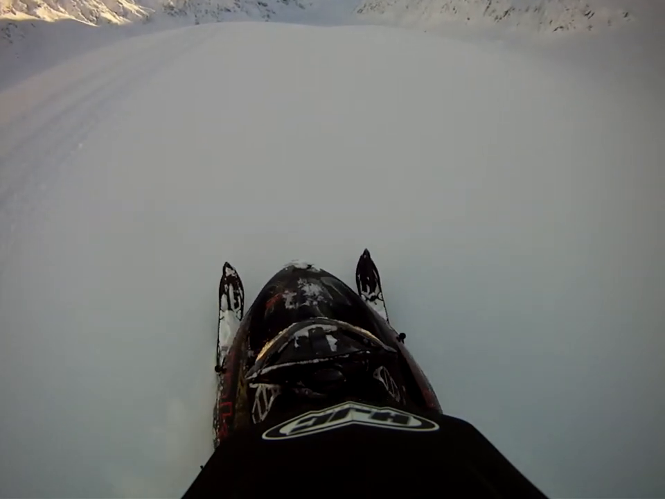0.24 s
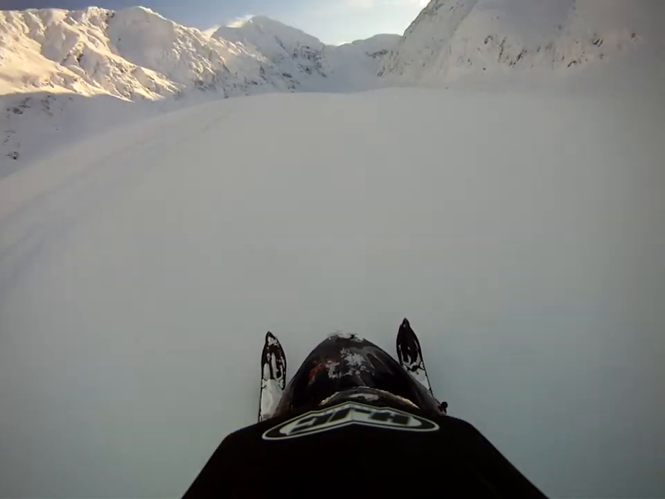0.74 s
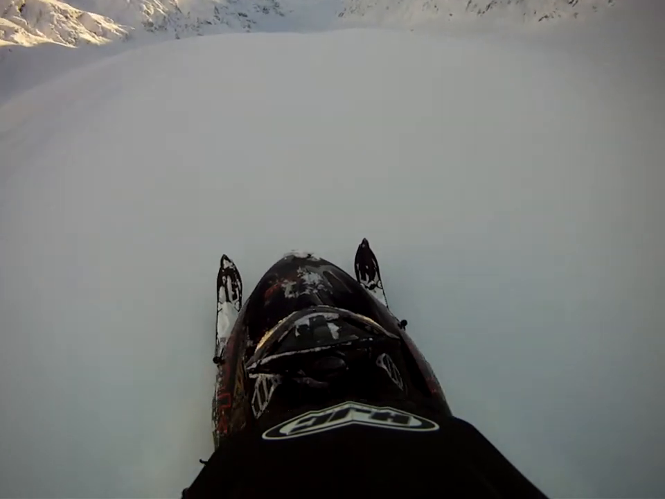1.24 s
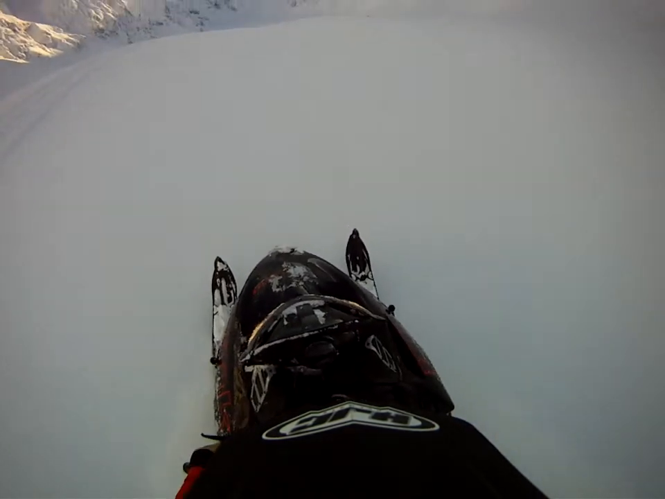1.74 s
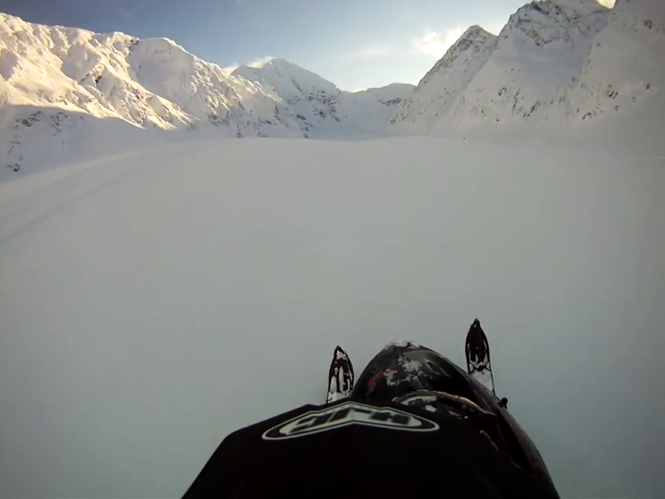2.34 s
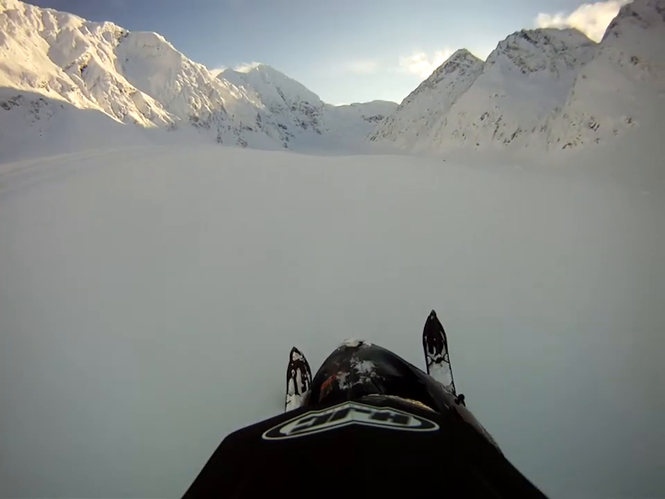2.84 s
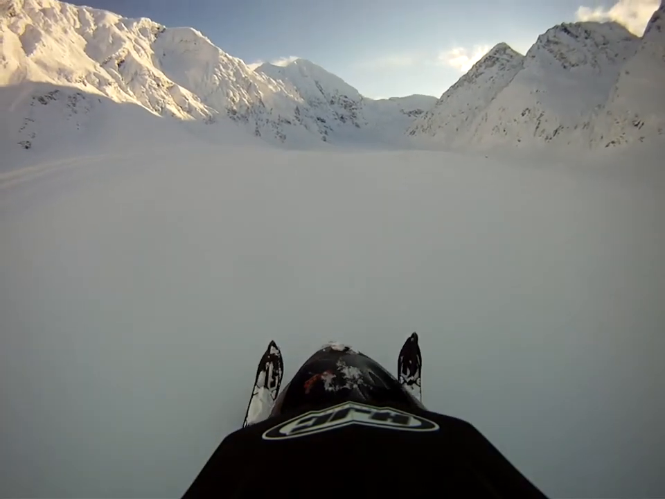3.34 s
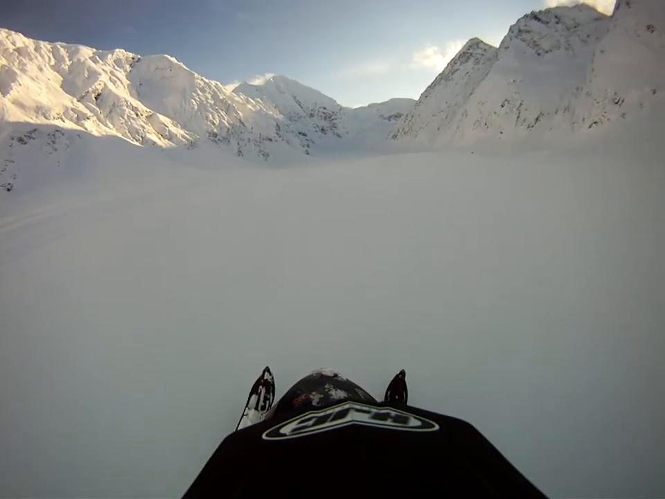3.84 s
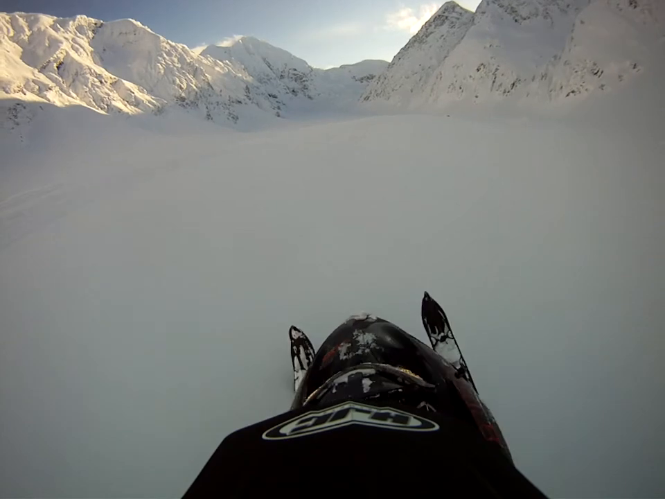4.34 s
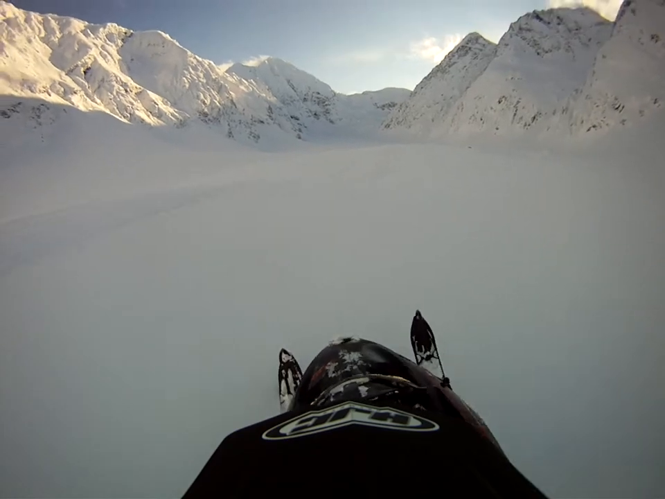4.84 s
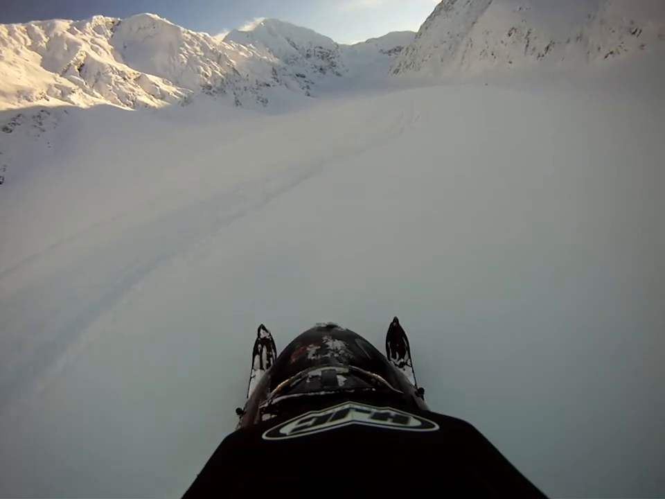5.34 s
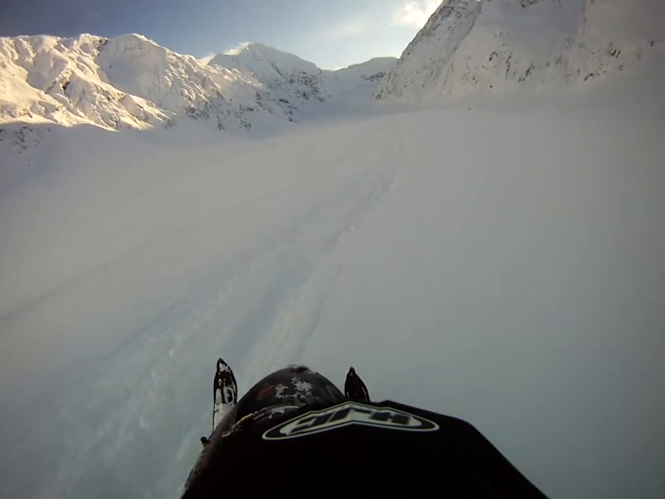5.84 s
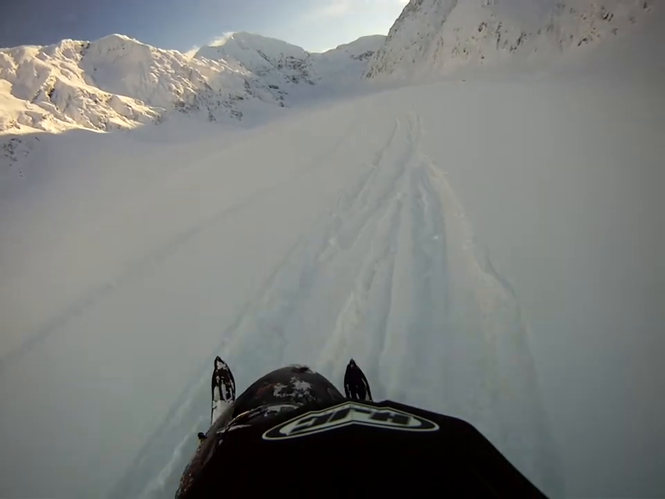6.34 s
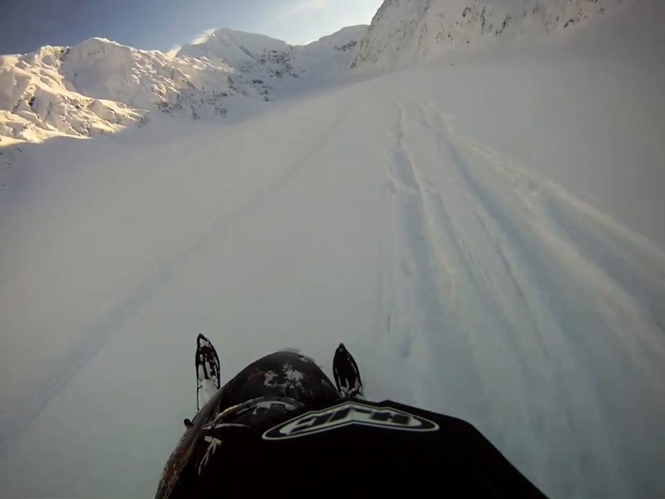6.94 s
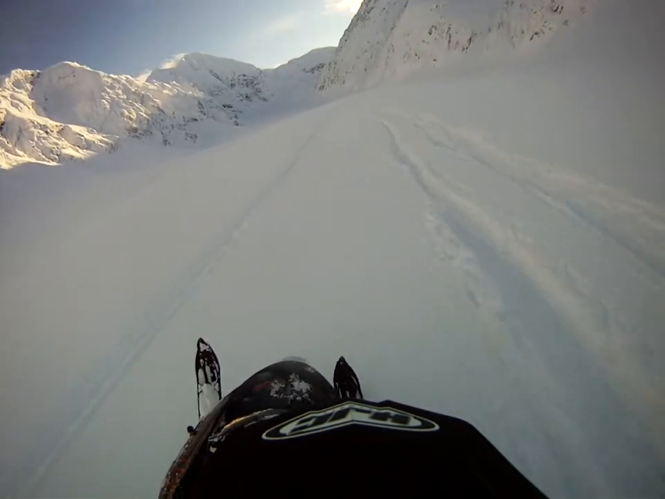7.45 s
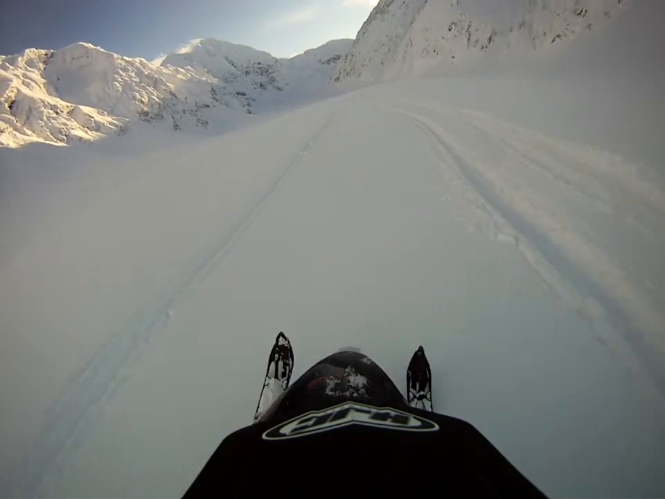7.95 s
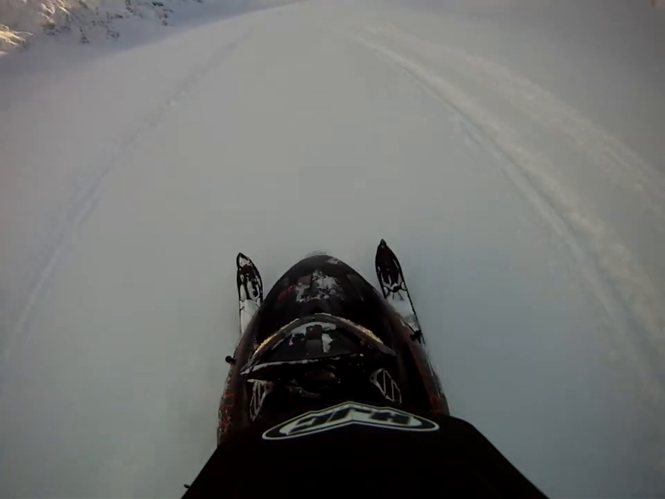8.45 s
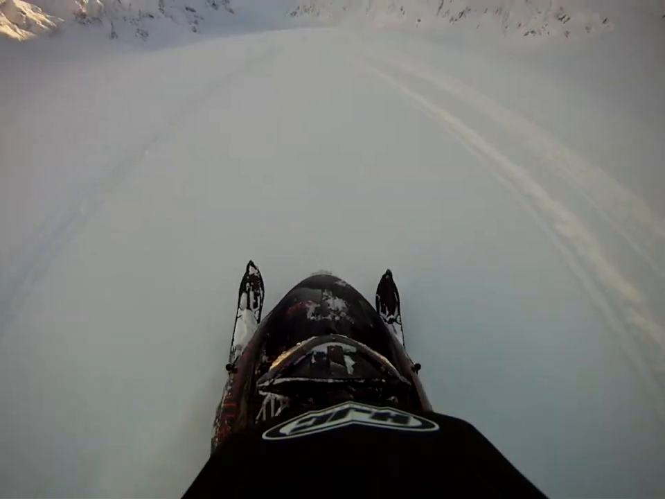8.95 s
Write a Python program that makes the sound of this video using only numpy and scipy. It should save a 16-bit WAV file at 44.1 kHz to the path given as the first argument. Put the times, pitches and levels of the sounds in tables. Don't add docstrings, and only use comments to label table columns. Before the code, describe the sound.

A two-stroke snowmobile howls at high revs up a snowy slope, stumbles with a few pops midway, then climbs back to a raspier, louder howl.

```python
import sys
import numpy as np
from scipy import signal
from scipy.fft import rfft, irfft, next_fast_len
from scipy.io import wavfile
from scipy.ndimage import uniform_filter1d

SR = 44100
rng = np.random.default_rng(int(sys.argv[2]) if len(sys.argv) > 2 else 0)


def master_out(mix):
    frames = np.transpose(np.atleast_2d(mix))
    ceiling = np.clip(frames, -1, 1)
    pcm = np.round(ceiling * 32767).astype(np.int16)
    wavfile.write(sys.argv[1], SR, pcm)


def field_ratio(decibels):
    return 10 ** (np.asarray(decibels, dtype=float) / 20)


N = 404838
T = np.arange(N) / SR


def level(x, db):
    return x * field_ratio(db) / np.sqrt(np.mean(x ** 2))


def curves(table):
    s, *columns = np.transpose(table)
    return [np.interp(T, s, column) for column in columns]


def swells(rows):
    out = np.zeros(N)
    for s, length, size in rows:
        a, b = (int(np.clip((s + side * length) * SR, 0, N)) for side in (-.5, .5))
        out[a:b] += size * np.cos(np.pi * (T[a:b] - s) / length) ** 2
    return out


def walk(rate):
    k = int(SR / rate)
    steps = np.repeat(rng.standard_normal(N // k + 1), k)
    return np.sqrt(2) * uniform_filter1d(uniform_filter1d(steps, k), k)[:N]


def coloured(shape):
    hz, db = np.transpose(shape)
    size = next_fast_len(N)
    f = np.maximum(np.fft.rfftfreq(size, 1 / SR), 1)
    gain = field_ratio(np.interp(np.log(f), np.log(hz), db)) * (f < 6000)
    return level(irfft(rfft(rng.standard_normal(size)) * gain, size)[:N], 0)


# t/s, crank f/Hz
REVS = [(0.0, 122.4), (2.07, 120.3), (2.42, 123.4), (2.62, 129.5), (2.91, 131.4), (3.82, 129.4),
        (4.06, 122.2), (4.25, 119.4), (4.65, 121.7), (4.77, 110.0), (4.87, 103.5), (4.95, 101.7),
        (5.15, 110.1), (5.4, 114.9), (6.44, 118.8), (7.23, 123.9), (7.42, 129.8), (9.18, 134.0)]
# centre t/s, length/s, crank f/Hz
FLARES = [(0.27, 1.0, -1.0), (1.21, 0.67, -0.26), (1.68, 0.53, 0.49), (3.34, 0.76, -1.81),
          (4.44, 0.35, -0.41), (5.76, 0.44, -1.43), (6.1, 0.59, 2.05), (6.38, 0.3, -0.9),
          (6.71, 0.39, 1.37), (7.65, 0.48, 2.08), (8.11, 0.69, 3.13), (8.56, 0.7, -1.47),
          (9.16, 0.48, -0.91)]


def revs():
    return uniform_filter1d(curves(REVS)[0], size=1500) + swells(FLARES)


def crank(hz):
    falling = np.clip(-uniform_filter1d(np.gradient(hz) * SR, 2000) / 80, 0, 1)
    return np.cumsum(hz * (1 + .001 * walk(30))) / SR + .007 * falling * walk(70)


# t/s, roar level/dB, unevenness of the two cylinders level/dB
GAS = [(0, -26, -3), (1.3, -27, -3), (2.9, -26, -3.5), (3.7, -26.5, -3), (3.9, -30.5, -2), (4.05, -26, 4),
       (4.3, -26.5, 1.5), (4.66, -26.5, 1), (4.7, -23, 6), (4.85, -26, 16.5), (5.5, -27, 9.5),
       (5.9, -24.5, 10), (6.75, -22.5, -4), (7.87, -20.5, 4.5), (7.95, -18, -6), (8.12, -27.5, -5),
       (8.35, -21.5, 0), (9.18, -24, 1)]


def gas_flow():
    return curves(GAS)


# t/s, throttle 0-1, pipe howl level/dB
LOAD = [(0.0, 0.21, -17.5), (2.15, 0.18, -18), (2.37, 0.44, -22.5), (2.46, 0.84, -17), (3.3, 0.81, -14.5),
        (3.955, 0.81, -17.5), (3.995, 0.24, -20.5), (4.4, 0.37, -19.5), (4.68, 0.4, -26.5), (5.2, 0.2, -22),
        (6.55, 0.04, -25), (6.68, 0.15, -18), (7.15, 0, -18.5), (7.35, 0.42, -11), (7.85, 0.44, -17),
        (7.95, 0.87, -11), (8.4, 0.86, -17), (9.18, 0.75, -12)]
# crank order, part throttle level/dB, full throttle level/dB, change off the pipe level/dB
STRONG = [(2.0, -9, -28.5, 5), (4.0, -16, -17.5, 7), (6.0, -21, -23.5, 8.5), (8.0, -32, -9.5, 8),
          (10.0, -15, -6.5, 5), (12.0, -1, 3, -6.5), (14.0, -19.5, 0, 14.5), (15.0, -3, -25, -20.5),
          (16.0, -7.5, -15.5, -3), (18.0, -24.5, -13, 15), (24.0, -30.5, -4.5, -6)]
# crank order, part throttle level/dB, full throttle level/dB
WEAK = [(1, -30.5, -28.5), (3, -30.5, -27), (5, -35.5, -26.5), (7, -24, -39), (9, -19, -20),
        (11, -23.5, -5.5), (13, -49, -27.5), (17, -10.5, -41), (19, -18, -32), (20, -10.5, -50),
        (21, -27.5, -49), (22, -48, -9.5), (23, -50, -23), (25, -48, -29), (26, -26, -16.5), (27, -44, -33),
        (28, -18, -59.5), (29, -16, -69), (30, -51, -32)]
# crank order, level/dB
RASP = [(32, -6.5), (34, -2), (36, -4), (38, -1.5), (40, -0.5), (42, -4), (44, -11)]
# centre t/s, length/s, level/dB
RASPS = [
    (2.42, .25, -5),
    (2.85, 1.8, 7),
    (3.6, 1.3, -2.5),
    (6.3, .4, -7),
    (7.75, 0.41, -7),
    (8.65, 1.44, 7.5),
]
SHUT_DB = {4: -3.5, 6: -13, 8: 2}
# centre t/s, length/s, crank
# order, level/dB
ORDER_SWELLS = [(2.19, 0.7, 4, -3.5), (2.328, 0.78, 8, 10), (2.462, 1.1, 6, 10.5), (2.898, 0.78, 4, 6),
                (3.244, 1.36, 6, 5), (3.62, 0.47, 8, 10), (3.642, 0.68, 2, 6.5), (4.607, 0.92, 6, 16),
                (4.625, 0.89, 4, 13), (4.63, 0.74, 2, -10), (6.33, 1.94, 4, 9.5), (6.372, 0.91, 2, 8),
                (6.6, 0.46, 6, 9), (7.007, 0.69, 6, 12.5), (7.227, 0.64, 2, -11.5), (7.44, 0.38, 6, -16),
                (7.879, 1.3, 2, -14), (8.48, 0.62, 4, 8), (8.54, 0.86, 2, 12.5),
                (1.54, 0.88, 10, 4.5), (1.72, 1.5, 16, -14), (2.348, 0.38, 15, 9), (2.53, 1, 10, 5.5),
          (2.66, 0.69, 16, 10), (2.87, 1.3, 14, -10), (3.23, 0.34, 24, -23), (3.45, 0.53, 12, -6),
          (3.87, 1, 18, -7), (4.54, 0.49, 14, 12), (4.54, 0.63, 18, 12), (4.83, 0.18, 15, 19),
          (6.82, 0.69, 16, 5), (7.07, 0.83, 12, -10.5), (7.48, 1.75, 10, -27), (7.63, 0.96, 12, -12.5),
          (8.0, 1.1, 15, 19), (8.099, 0.69, 16, 5.5), (8.14, 0.34, 24, -43), (8.4, 0.55, 18, 12),
          (8.56, 0.84, 15, 14), (8.7, 0.84, 10, 6.5), (8.73, 0.22, 14, -6), (8.97, 1.2, 18, 7.5),
          (9.04, 1.15, 24, -11),
                (1.596, 0.67, 12, -4), (1.98, 0.28, 12, 2.5), (2.524, 0.56, 12, 1), (2.95, 0.46, 24, 3.5),
          (2.95, 0.5, 40, 7), (3.447, 0.43, 14, 4.5), (3.45, 0.83, 22, -15.5), (3.809, 0.41, 14, 6),
          (4.096, 0.32, 15, 8), (4.264, 0.47, 12, 4), (4.8, .25, 13, 20), (4.75, 0.36, 6, 9),
          (4.75, 0.17, 12, 6), (5.106, 0.32, 14, 4), (5.295, 0.22, 17, 11.5), (5.602, 1.2, 17, -5),
          (5.605, 0.77, 16, 5), (5.916, 0.26, 12, 2.5), (6.007, 0.52, 14, -5), (6.7, 0.22, 12, 1.5),
          (6.91, .1, 12, 7), (7.0, 0.35, 15, -2), (7.252, 0.21, 12, 4.5), (7.498, 0.96, 11, -12),
          (7.545, 0.14, 14, 10), (8.081, 0.27, 12, 1.5), (8.139, 0.32, 2, -9.5), (8.143, 0.23, 4, -3),
          (8.446, 0.25, 12, 1.5), (8.65, .7, 34, -7), (8.68, 0.49, 12, 3), (8.7, 1.3, 22, 3),
          (8.898, 0.5, 20, 27),
                (0, 0.47, 12, -5), (.5, 3.2, 11, 12), (1.6, 1.8, 21, 2), (1.685, .6, 17, 11.5), (2.58, 1, 11, 4),
          (2.95, .6, 13, 11), (3.03, 1.7, 20, 9), (3.85, 0.47, 22, -15), (3.78, .3, 4, -6),
          (4.12, 0.92, 11, -8), (4.823, 0.2, 14, 4), (4.87, .35, 5, 25), (4.38, 0.42, 16, -15),
          (4.478, 0.52, 20, 16), (4.85, 0.57, 1, 15), (4.95, 0.28, 11, 9.5), (5.0, 0.13, 14, -4),
          (5.2, .6, 8, -5), (5.2, .6, 7, -8), (6.05, 0.78, 11, -17), (7.4, .6, 26, -13), (7.5, 1.8, 9, 6),
          (7.982, 0.23, 18, 8), (8.0, 0.19, 10, 9), (8.8, 1.8, 28, 22.5), (8.98, 0.66, 13, 12),
          (9.0, 0.87, 11, -5), (8.8, 2.1, 30, 13),
                (0.23, 0.23, 18, 6), (0.728, 0.6, 18, -14), (1.1, 0.29, 18, 4), (1.7, 0.54, 13, 10),
         (1.829, 0.52, 11, 6), (2.35, 0.52, 17, 12), (2.45, 0.9, 9, 10), (2.68, 1.2, 7, 11),
         (2.88, 0.45, 14, 8), (2.9, 1.3, 16, -2), (2.95, 1.4, 13, 11.5), (3.85, 0.25, 11, -11),
         (3.9, 0.28, 17, 17), (4.23, 0.6, 5, -14), (4.23, 0.65, 11, 8), (4.35, 0.9, 17, -12),
         (4.502, 0.6, 15, -10), (4.8, 0.4, 3, 19), (4.8, 0.6, 1, 10), (4.93, 0.6, 18, -13),
         (4.982, 0.86, 12, -12), (5.0, 0.69, 10, -9), (5.38, 1.3, 15, 13), (5.45, 0.25, 18, -13),
         (5.5, 1.2, 13, 13), (6.0, 0.54, 9, -15), (6.1, 1, 14, 14), (6.15, 0.34, 12, -8),
         (6.5, 0.82, 17, -9), (6.6, 1.4, 8, 11.5), (6.63, 0.25, 14, 7), (6.95, 1.2, 5, 9),
         (7.15, 0.6, 17, 7), (7.248, 0.62, 11, 14), (7.3, 0.52, 13, 12), (7.53, 1.6, 10, 10),
         (7.73, 0.9, 9, -13), (7.75, 0.45, 14, 8), (7.78, 1.4, 15, -7), (7.95, 0.65, 2, 10.5),
         (8.78, 0.9, 13, 11), (8.9, 1.4, 17, 14),
                (0.28, 0.4, 24, -14), (0.3, 1.4, 42, 7), (0.43, 1.4, 21, 12), (1.05, 1.3, 40, -9),
          (1.1, 0.4, 19, 8), (1.58, 0.9, 25, 9), (1.58, 1.2, 23, 10), (1.603, 1.5, 21, 13.5),
          (1.75, 1.1, 28, -10), (1.83, 0.4, 19, -13), (2.0, 0.89, 29, -11), (2.4, 0.52, 44, 15),
          (2.5, 0.6, 28, 12), (2.68, 0.49, 22, -15), (2.7, 0.4, 38, 2), (2.9, 0.7, 26, -2),
          (2.803, 0.44, 23, 18), (2.88, 1.3, 20, 16), (3.03, 1.9, 34, -16), (3.33, 1.4, 25, -12),
          (3.5, 0.9, 22, 8), (3.6, 0.9, 27, 12), (4.234, 0.23, 20, 13), (4.43, 1.4, 23, 13),
          (4.7, 1.5, 26, 7), (5.1, 0.9, 21, 11), (5.23, 0.9, 20, 10), (5.38, 1.4, 22, 14),
          (5.45, 0.9, 30, 12), (5.55, 0.6, 19, -10), (5.63, 1.4, 29, -6), (7.03, 0.8, 29, -8.5),
          (7.18, 0.69, 20, -14), (7.45, 0.85, 22, 5), (7.48, 0.6, 40, -13), (7.55, 0.55, 19, -11),
          (7.93, 1.1, 26, -3), (8.18, 1.4, 23, 4), (8.38, 1.6, 19, 13.5), (8.4, 1.4, 20, 8),
          (8.42, 0.4, 24, 3), (8.5, 1.6, 28, 15), (8.68, 1.4, 21, 12), (8.7, 0.6, 32, -11),
                (0.34, 0.4, 14, -9), (0.82, 0.6, 20, -3), (1.04, 0.6, 21, 12), (1.24, 0.25, 18, 9.5),
         (1.46, 0.6, 11, 8), (2.184, 0.25, 26, 10), (2.18, 0.6, 18, 8), (2.22, 0.6, 11, 10),
         (2.363, 0.3, 14, 6), (2.5, 0.4, 17, 10), (2.72, 0.34, 24, -11), (2.78, 0.34, 13, 6),
         (3.02, 0.25, 16, -11), (3.337, 0.4, 20, 14), (3.9, 0.2, 26, -10), (3.903, 0.25, 6, 5.5),
         (3.95, 0.15, 8, -7), (4.118, 0.48, 8, 11.5), (4.42, 0.97, 16, 5.5), (4.82, 0.4, 1, 11.5),
         (4.82, 0.6, 15, 11), (4.84, 0.4, 19, 10), (5.04, 1.24, 12, 5), (5.26, 0.4, 20, -12),
         (5.397, 1.4, 22, 13), (5.46, 0.9, 11, -9), (5.52, 1.4, 13, 13), (5.757, 0.36, 15, 17.5),
         (5.967, 0.45, 17, 7.5), (6.54, 0.18, 12, -10), (6.72, 0.1, 16, 6), (6.8, 0.06, 12, 8),
         (6.91, 0.07, 16, 5), (6.86, 0.32, 20, 7), (7.24, 0.65, 18, 10), (7.3, 0.27, 15, 7),
         (7.3, 0.53, 13, 12), (7.46, 0.16, 11, 13), (7.48, 0.25, 9, -12), (7.6, 0.9, 22, 8),
         (7.8, 0.33, 14, 4), (7.94, 0.14, 15, -11), (8.14, 1.3, 28, 13), (8.15, 0.2, 26, -8),
         (8.32, 0.47, 10, -8), (8.34, 1.4, 20, 7), (8.74, 0.6, 19, 5), (8.78, 0.4, 26, -10),
         (9.05, 0.38, 8, 3), (9.14, 0.4, 13, 11)]


def exhaust(turns, hz, roar_db, uneven_db):
    throttle, howl_db = curves(LOAD)
    throttle = np.clip(throttle, 0, 1)
    sag = np.clip((120.05 - hz) / 6, 0, 1)
    shut = uniform_filter1d(1. * (T > 4.683) * (T < 5.065), size=400)
    pipe_hz, pipe_width_hz = 1550, 220

    def blend(part_db, full_db):
        return part_db + throttle * (full_db - part_db) + howl_db - 4.5

    strong = {round(k): blend(part_db, full_db) + sag * sag_db for k, part_db, full_db, sag_db in STRONG}
    weak = {round(k): blend(part_db, full_db) for k, part_db, full_db in WEAK}
    rasp_db = -56 + 10 * throttle - 22 * sag + swells(RASPS) + 1.45 * walk(14)
    rasp_db = rasp_db + roar_db - np.mean(roar_db)
    weak |= {round(k): db + rasp_db for k, db in RASP}

    changes = ORDER_SWELLS
    out = np.zeros(N)
    for k, db in (strong | weak).items():
        db = db + swells((s, length, lift_db) for s, length, order, lift_db in changes if round(order) == k)
        db = db + SHUT_DB.get(k, 0) * shut
        if k in strong:
            db = db + 1.22 * walk(12)
        else:
            db = db + uneven_db * (k % 2) + 2.0 * walk(6) - 5.5 * sag
            db = db - 14 * np.clip(1 - k * hz / 1300, 0, 1) * np.clip((120 - hz) / 8, 0, 2)
        lag = np.arctan((k * hz - pipe_hz) / pipe_width_hz)
        jitter = max(min(k / 10, 1), k / 20) * .2 if k in strong or k > 7 else .7
        drift = jitter * walk(25) + (1.1 - .65 * throttle) * walk(.7)
        out += np.sqrt(2) * field_ratio(db) * np.cos(2 * np.pi * k * turns - lag + drift)
    return out


# f/Hz, level/dB per Hz
ROAR = [(100, -20), (200, -36), (500, -21), (850, -19.5), (1050, -11), (1400, -4), (1670, -5), (1850, -1),
        (2400, -7), (2750, -10), (3480, -10.5), (3650, -16.5), (4080, -22.5), (4400, -25), (5200, -17.5),
        (5900, -27.5)]
# centre t/s, length/s, level/dB
ROAR_SWELLS = [
    (1.05, .6, 0.5),
    (1.95, .3, -1),
    (4.35, 0.67, 0),
    (5.45, 0.46, 0.5),
    (6.14, 0.1, 2),
    (6.42, 0.37, 0),
    (6.9, 0.14, 0),
    (8.5, .6, 0.5),
]


def roar(turns, roar_db):
    puff = np.exp(-(2 * turns % 1) / 1.3) * (1 + 0.18 * np.sign(turns % 1 - .5))
    gas = level((2.1 + puff) * coloured(ROAR), 0)
    return gas * field_ratio(roar_db + swells(ROAR_SWELLS) + 0.79 * walk(9))


# centre t/s, length/s, level/dB over the calm
GUSTS = [(.15, 0.24, 13), (.51, .35, 9), (.78, .2, 6), (1.02, .2, 3), (1.31, .25, 8), (1.66, 0.56, 6),
         (2.2, 1, 4.5), (3.45, .6, 2), (3.88, 0.56, -9), (4.33, 0.12, -3), (4.6, .3, 3), (4.97, 0.62, 5.5),
         (5.65, .5, 5), (6.05, 0.45, 3), (6.63, 1.1, 6.5), (7.4, 1.15, 6.5), (8.0, .25, 7.5),
         (8.17, 0.27, -8), (8.55, 0.69, 7.5), (9.1, .15, 2)]
# f/Hz, level/dB per Hz
WIND = [(15, -17), (30, -5), (45, -6.5), (100, -12), (200, -7.5), (500, -18.5)]


def wind():
    hum_hz, width_hz = 77.5, 5.6
    hum = coloured([(20, -40), (hum_hz - width_hz, -12), (hum_hz, 0), (hum_hz + width_hz, -12),
                    (200, -45), (400, -80)])
    gust_db = -42 + swells(GUSTS)
    buffet = field_ratio(0.59 * gust_db - 19.5) * coloured([*WIND, (2000, -45)])
    return buffet + field_ratio(gust_db + 0.5) * hum


# t/s, engine level/dB
STUMBLE = [
    (4.68, 3.5),
    (4.686, -1),
    (4.697, -3),
    (4.71, -1.5),
    (4.77, 0),
    (4.81, 0.5),
]


def stumble():
    return field_ratio(curves(STUMBLE)[0])


# t/s, peak level/dB
BANGS = [
    (4.69, -9),
    (4.75, -10),
    (4.8, -21),
    (4.87, -15),
    (4.9, -60),
]


def pops(turns, hz):
    since = turns - turns[int(4.698 * SR)]
    t = since % 1 / hz
    firing = (since > 0) & (np.floor(since) != 1)
    ring = np.minimum(t / 0.00047, 1) * np.exp(-t / 0.0031) * np.sin(2 * np.pi * 1450 * t)
    return -firing.astype(float) * field_ratio(curves(BANGS)[0]) * ring


def scene():
    hz = revs()
    turns = crank(hz)
    roar_db, uneven_db = gas_flow()
    engine = exhaust(turns, hz, roar_db, uneven_db) + roar(turns, roar_db)
    return (engine * stumble() + pops(turns, hz) + wind())[None]


def low_pass(x):
    return signal.sosfilt(signal.butter(12, 15330, fs=SR, output="sos"), x)


def record(dry):
    bent = dry - 0.22 * dry ** 3
    bent = signal.sosfilt(signal.butter(1, 12, "high", fs=SR, output="sos"), bent)
    slow = signal.resample_poly(bent, 40, 147, axis=1)
    held = np.repeat(slow, 4, axis=1)
    mix = signal.resample_poly(held, 147, 160, axis=1)[:, :N]
    return low_pass(mix)


dry = scene()
out = record(dry)
master_out(out)
```